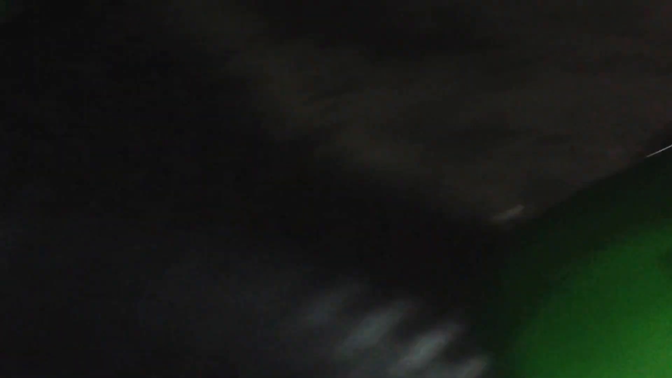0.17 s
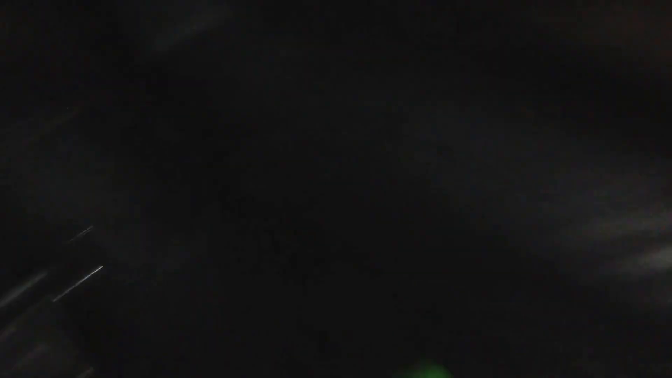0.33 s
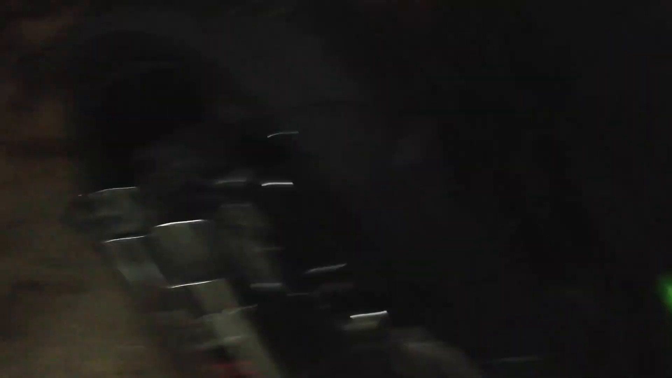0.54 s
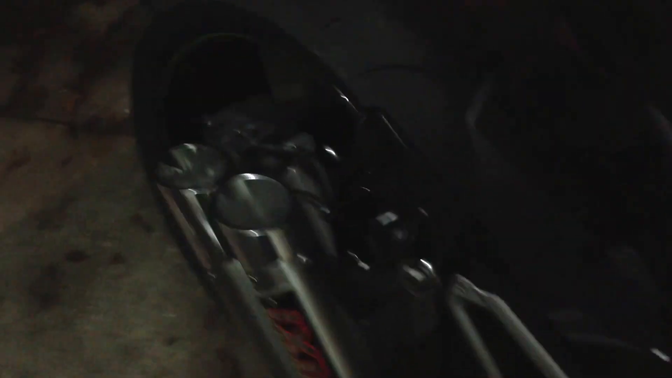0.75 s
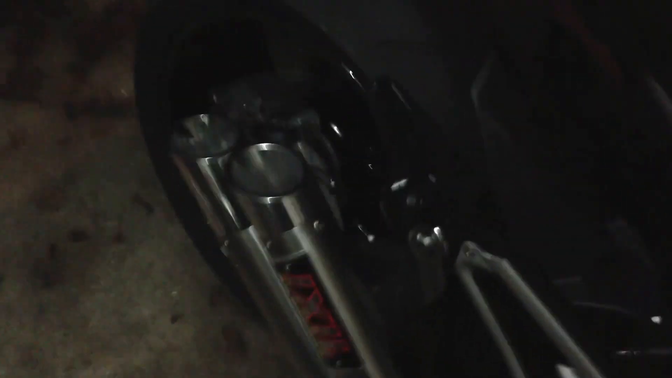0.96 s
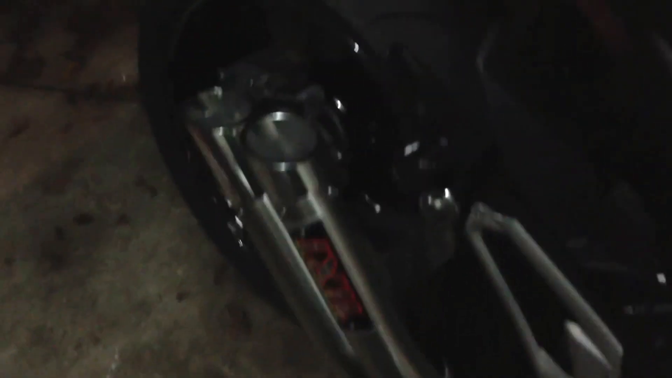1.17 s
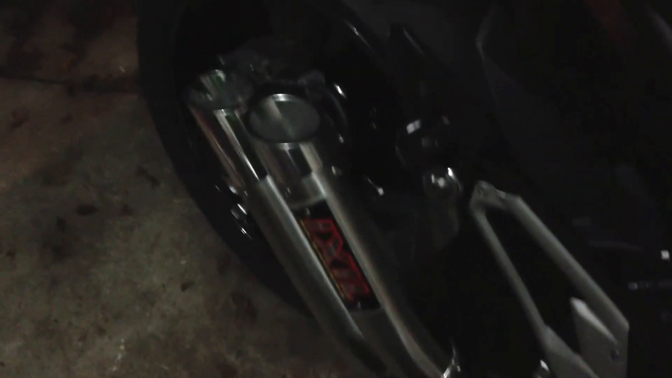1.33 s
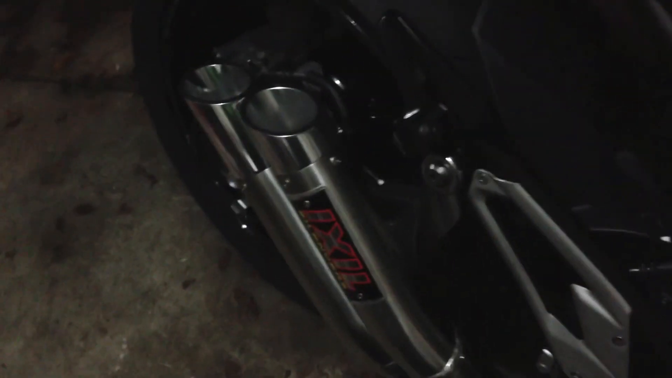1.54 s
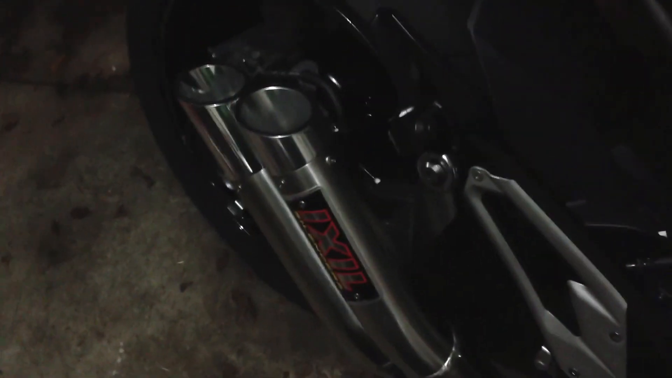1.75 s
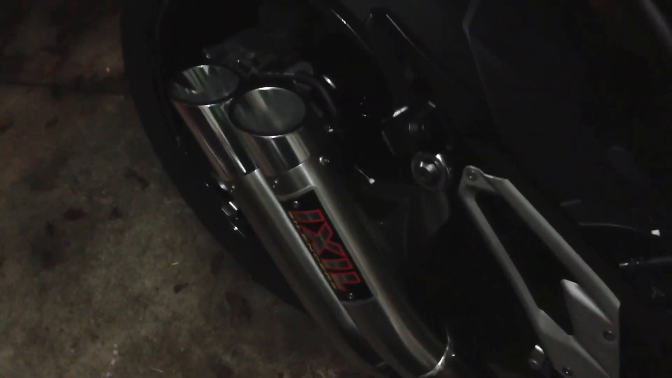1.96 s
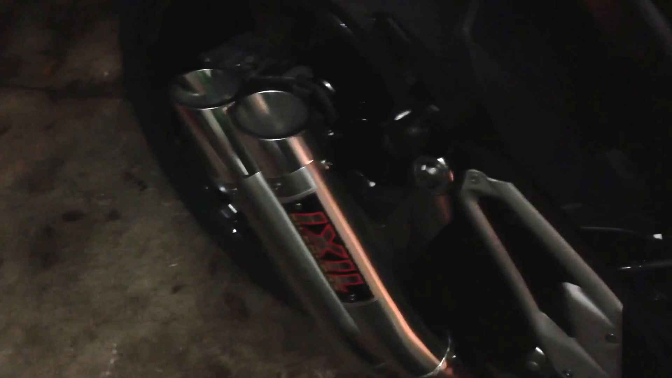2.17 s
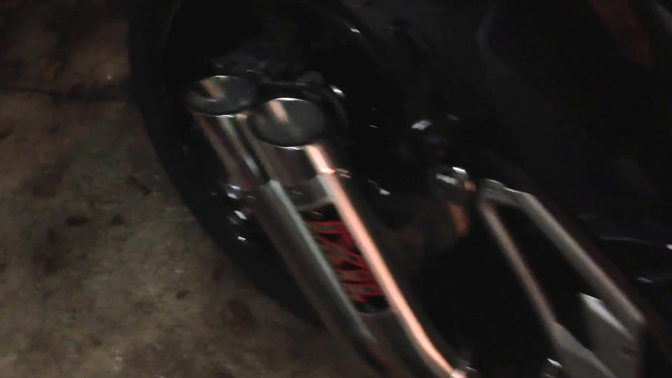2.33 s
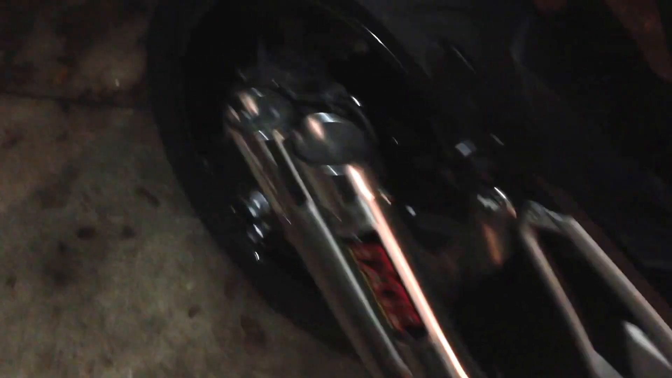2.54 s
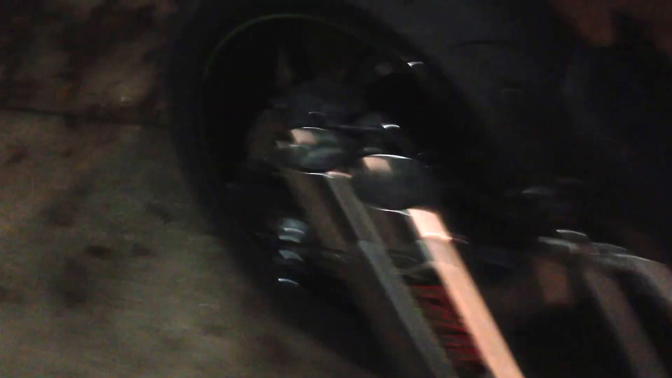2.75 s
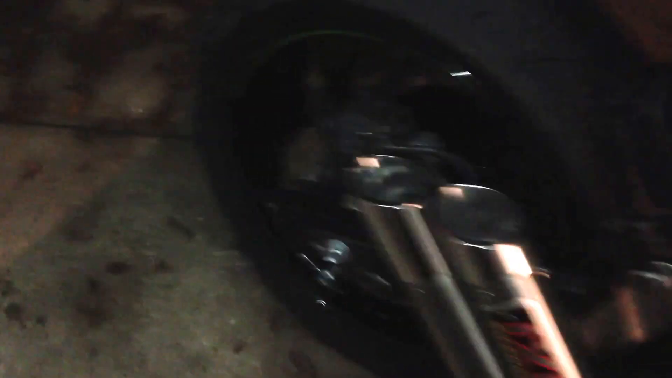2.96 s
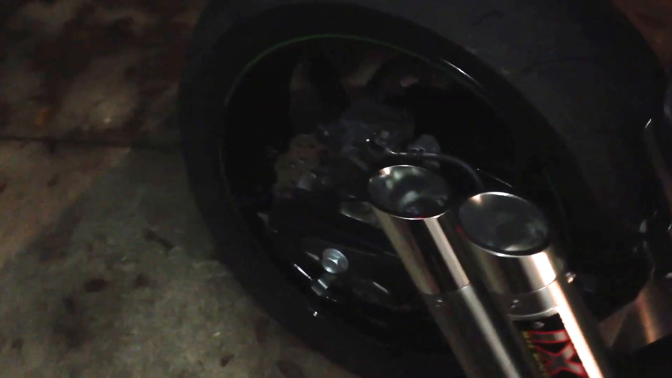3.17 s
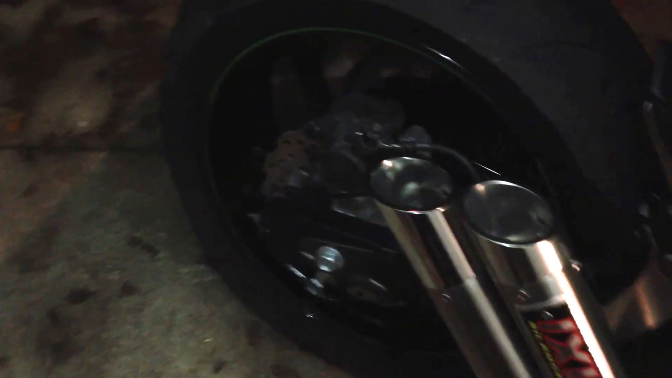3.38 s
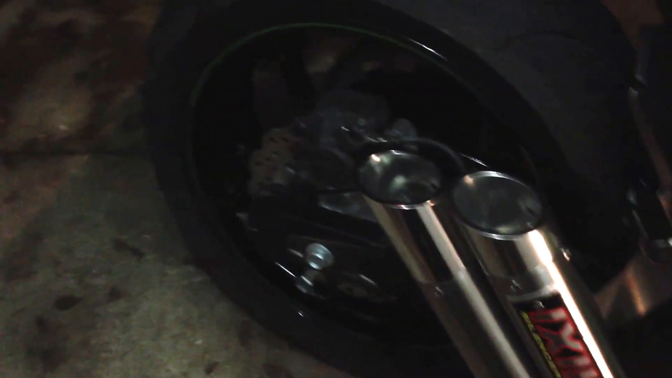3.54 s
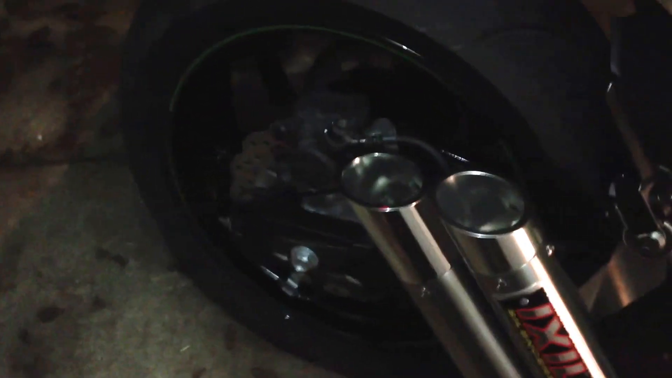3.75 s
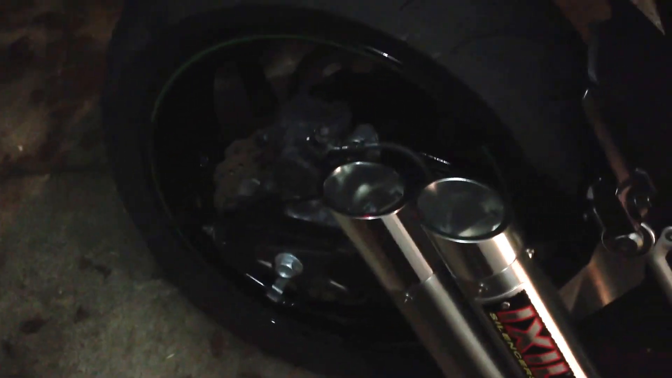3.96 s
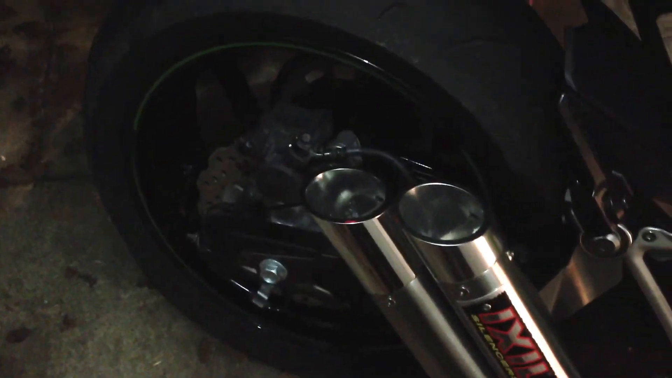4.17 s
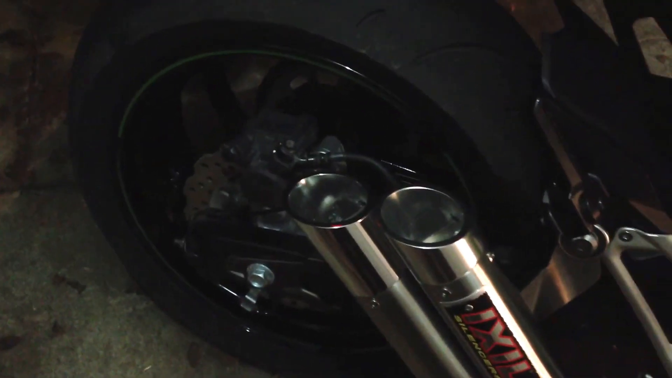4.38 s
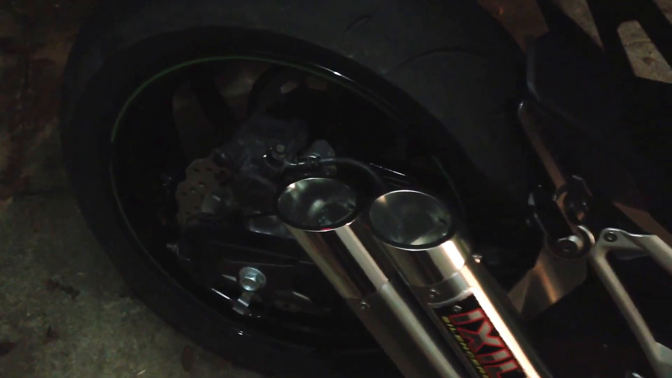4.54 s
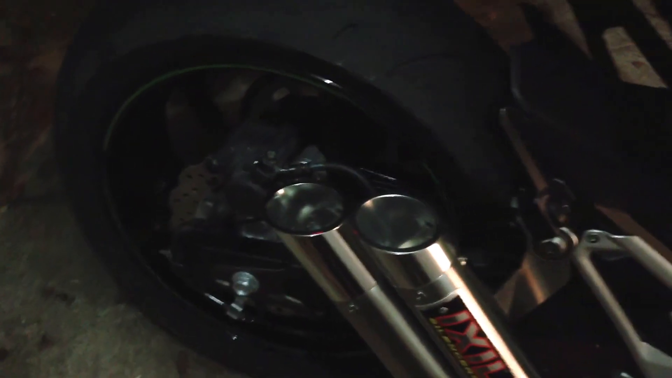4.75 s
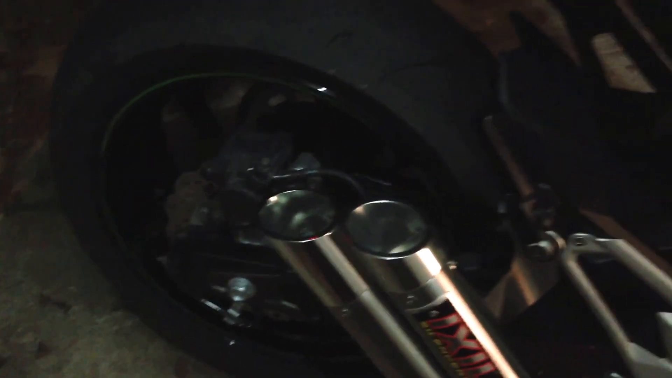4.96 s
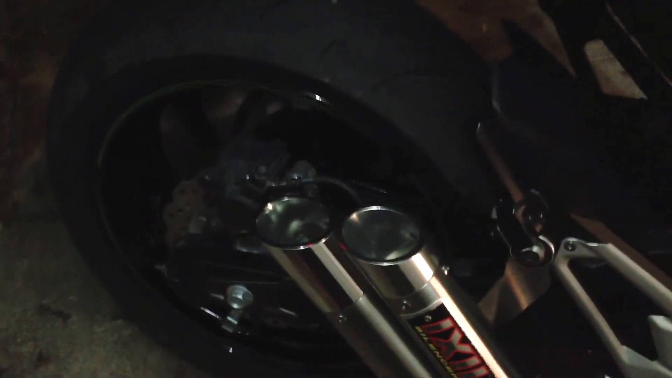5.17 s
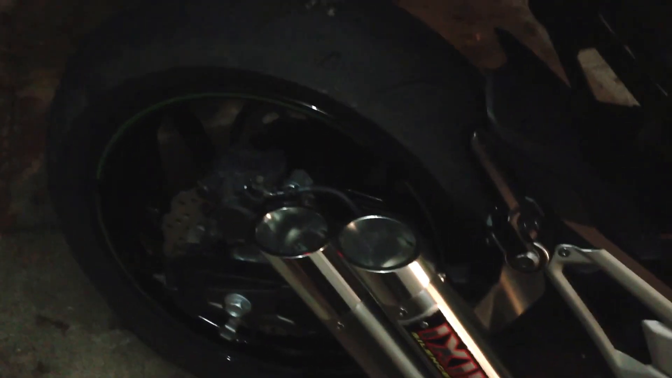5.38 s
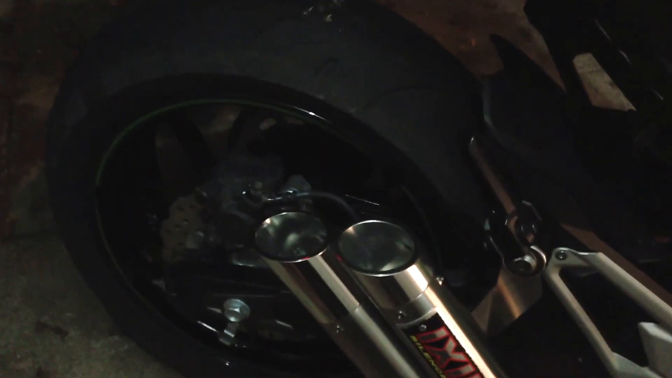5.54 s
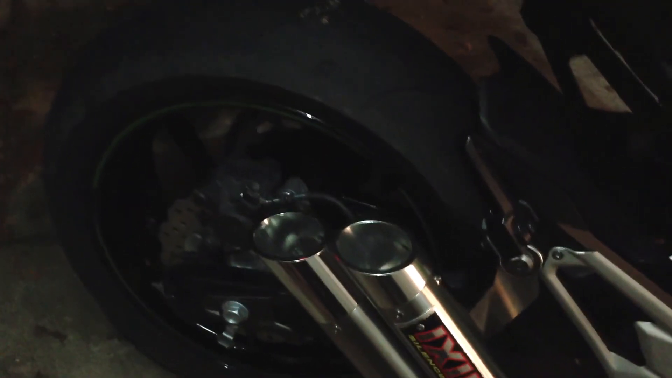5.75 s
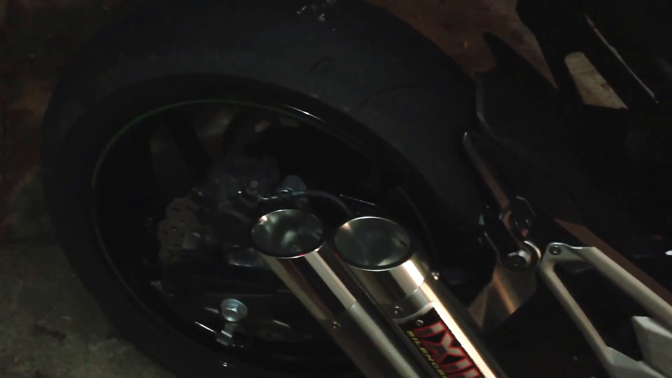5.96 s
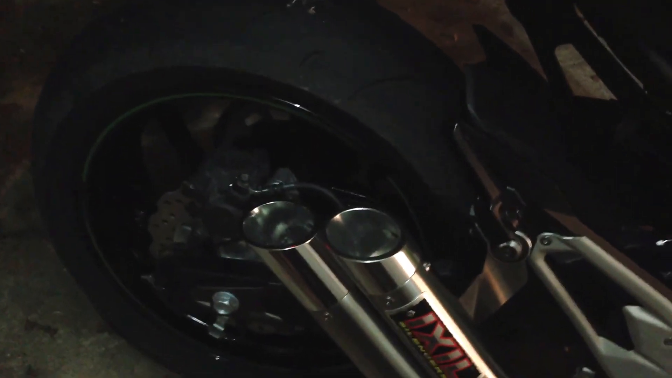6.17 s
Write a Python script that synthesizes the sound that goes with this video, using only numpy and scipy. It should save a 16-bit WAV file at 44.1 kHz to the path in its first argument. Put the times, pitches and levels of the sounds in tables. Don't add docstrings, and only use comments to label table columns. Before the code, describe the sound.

In a quiet outdoor yard with faint distant traffic, a shoe scrapes grit, faintly then hard. After a pause, a starter motor clunks in and grinds through two lurches. A cold four-cylinder motorcycle catches with a burst, stumbles with rattles and small squeaks, then settles into a loud, lumpy, hollow idle. A small microphone close to the pipe thins the deep bass and squashes the loudest blasts.

```python
import sys
import numpy as np
from scipy import signal
from scipy.fft import rfft, irfft, next_fast_len
from scipy.io import wavfile
from scipy.ndimage import uniform_filter1d, minimum_filter1d

SR = 44100
rng = np.random.default_rng(int(sys.argv[2]) if len(sys.argv) > 2 else 0)


def gain_from_db(level_db):
    decades = np.asarray(level_db, float) / 20
    return 10 ** decades


def dump(signal):
    limited = np.clip(np.atleast_2d(signal).T, -1, 1)
    pcm = np.round(limited * 32767).astype(np.int16)
    wavfile.write(sys.argv[1], SR, pcm)


N = 273861
T = np.arange(N) / SR
SIZE = next_fast_len(N + SR)
HZ = np.fft.rfftfreq(SIZE, 1 / SR)

# (time [s], firing rate [1/s])
SPEED = [(1.9, 44.29), (2.0, 44.68), (2.19, 36.66), (2.29, 31.88), (2.4, 36.7), (2.49, 39.63),
         (2.65, 37.36), (2.74, 38.58), (3.19, 42.77), (3.49, 43.27), (3.59, 44.02), (4.19, 46.03),
         (4.5, 46.32), (4.64, 46.29), (5.18, 46.87), (5.52, 48.53), (5.61, 48.05), (6.21, 49.01)]
CATCH_AT_S = SPEED[0][0]
CYLINDER_BITE_DB = [1.5, 4.1, 4.5, 1.5]
# (frequency [Hz], width [Hz], level [dB])
HOUSING = [(800, 220, 4), (1060, 26, -18), (1223, 150, 6.5), (1580, 215, 12.5), (1933, 123, 13),
           (2675, 29, 14.5), (3095, 22, 11.5), (3330, 62, 13), (3470, 27, 4), (3790, 21, 11.5),
           (4760, 57, -9), (6300, 110, -17), (7580, 91, -14), (7960, 34, -7.5), (9700, 49, -24)]


def evened(x):
    return x / np.sqrt(np.mean(x ** 2) + 1e-20)


def filtered(x, gain):
    return irfft(rfft(x, SIZE) * gain, SIZE)[:N]


def colour(points):
    hz, db = np.transpose(points)
    return gain_from_db(np.interp(np.log(HZ + 1), np.log(hz), db))


def mode(hz, width_hz):
    return 1j * HZ * width_hz / (hz ** 2 - HZ ** 2 + 1j * HZ * width_hz)


def modes(table):
    return sum((-1) ** k * gain_from_db(db) * mode(hz, width_hz) for k, (hz, width_hz, db) in enumerate(table))


def curve(rows, column):
    rows = np.array(rows)
    return np.interp(T, rows[:, 0], rows[:, column])


def level(rows, fade_s):
    start, end = rows[0][0], rows[-1][0]
    edge = np.interp(T, [start, start + fade_s, end - fade_s, end], [0, 1, 1, 0])
    return gain_from_db(curve(rows, 1)) * edge


def clicks(at, size):
    return np.bincount(np.asarray(at, int), size, N)[:N]


def grains(per_s, spread_db):
    draw = rng.random((N, 3))
    size = gain_from_db(-spread_db * np.log(draw[:, 2] + 0.029))
    return (draw[:, 0] < per_s / SR) * np.sign(draw[:, 1] - .5) * size


def swell(at, db, rise_s, fall_s):
    t = np.arange(6000) / SR
    shape = (1 - np.exp(-t / rise_s)) * np.exp(-t / fall_s)
    return signal.oaconvolve(clicks(at, gain_from_db(db)), shape)[:N]


def drifting(noise, window):
    return evened(uniform_filter1d(noise, window))


def yard():
    # (frequency [Hz], density [dB per Hz])
    yard_colour = [(18, -83), (30, -56), (124, -12.5), (161, -2), (327, -20), (425, -14), (473, -19),
                   (568, -14), (631, -18.5), (1390, -18.5), (2470, -26.5), (14700, -36), (15900, -49)]
    drift = drifting(rng.standard_normal(N), 6000)
    return gain_from_db(-56.5 + .5 * drift) * evened(filtered(rng.standard_normal(N), colour(yard_colour)))


def scuffs():
    # (time [s], level [dB])
    scuff_rows = [
        [(0.29, -67), (0.314, -50), (0.338, -47), (0.348, -39.5), (0.404, -47), (0.46, -67)],
        [(0.51, -67), (0.554, -18.5), (0.596, -24.5), (0.602, -22.5), (0.632, -36), (0.7, -66)],
    ]
    # (frequency [Hz], density [dB per Hz])
    grit_colour = [(180, -69), (300, -32), (511, -24), (841, -26), (929, -13), (1080, -19), (1190, -12.5),
                   (2240, -2.5), (2650, -5), (14400, -35.5), (15900, -58)]
    # (time [s], peak [dB])
    stones = [(0.3162, -38), (0.3461, -31), (0.5444, -21), (0.5536, -10), (0.5604, -14), (0.5664, -18),
              (0.5744, -15), (0.5814, -18), (0.6005, -9), (0.6064, -13)]
    grit = evened(grains(3000, 3)) + .6 * rng.standard_normal(N)
    grit = evened(filtered(grit, colour(grit_colour)))
    s, db = np.transpose(stones)
    crack = filtered(clicks(s * SR, gain_from_db(db + 21)), mode(1960, 440) - 0.51 * mode(3440, 900))
    return .5 * grit * sum(level(rows, 0.0092) for rows in scuff_rows) + crack


def grinding():
    return rng.standard_normal(N) + 0.51 * evened(grains(900, 2.4))


def starter():
    # (time [s], gear mesh rate [Hz], whine share [0-1])
    mesh_rows = [(1.535, 600, .15), (1.6, 900, .15), (1.641, 1112, .5), (1.685, 1068, .6), (1.72, 945, .68),
                 (1.752, 795, .62), (1.805, 750, .3), (1.865, 945, .38), (1.96, 1018, .12)]
    # (frequency [Hz], density [dB per Hz])
    grind_colour = [(71, -48), (120, -16.5), (295, -4.5), (788, -15.5), (947, -8), (1490, -11), (1860, -2),
                    (2380, -7.5), (3730, -1.5), (5070, -21.5), (9560, -24.5), (14400, -36), (15900, -56)]
    # (time [s], load [dB], fall [s], squeal above 5 kHz re load [dB])
    lurches = [
        (1.537, -21.5, 0.034, -11),
        (1.571, -22.5, 0.056, -17),
        (1.632, -25, 0.033, 0.5),
        (1.658, -20.5, 0.036, -1.5),
        (1.706, -10.5, 0.022, -24),
        (1.743, -17.5, 0.023, -25),
        (1.830, -9.5, 0.019, -9.5),
        (1.857, -12, 0.022, -17),
    ]
    wobble, flutter = rng.standard_normal((2, N))
    mesh_turns = np.cumsum(curve(mesh_rows, 1) * (1 + .025 * drifting(wobble, 250))) / SR
    broken = gain_from_db(2.6 * drifting(rng.standard_normal((6, N)), 600))
    teeth = sum(b * np.cos(2 * np.pi * (k * mesh_turns + rng.random())) for k, b in enumerate(broken, 1))
    teeth = teeth * gain_from_db(2.5 * drifting(flutter, 120))

    grind = grinding()
    housing, tint = modes(HOUSING), colour(grind_colour)
    upper = 1 / (1 + (5000 / (HZ + 1)) ** 8)
    rough = .5 * evened(filtered(grind, tint * (1 - upper)))
    rough = rough + 0.73 * evened(filtered(grind, housing * (1 - upper)))
    whine = evened(filtered(teeth, housing + 0.37 * mode(1500, 3800)))
    squeal = evened(filtered(grind, (0.87 * housing + 1.15 * tint) * upper))
    squeal = squeal * gain_from_db(2.5 * drifting(wobble, 300))

    heave = np.array([swell([s * SR], [db], 0.0072, fall_s) for s, db, fall_s, _ in lurches])
    heave = heave + gain_from_db(-27.5) / len(lurches)
    shrill = gain_from_db(np.array(lurches)[:, -1]) @ heave
    share = np.clip(curve(mesh_rows, 2), 0, 1)
    engaged = np.interp(T, [1.9, 1.98], [1, 0]) * (T > lurches[0][0])
    return engaged * (1.91 * heave.sum(0) * (share * whine + (1 - share) * rough) + shrill * squeal)


def knocks():
    # (time [s], peak [dB])
    knock_rows = [
        (1.5375, 3),
        (1.8317, 2),
    ]
    s, db = np.transpose(knock_rows)
    burst = rng.standard_normal(N) * swell(s * SR, db - 9, 0.0004, 0.0045)
    return filtered(burst, mode(4000, 5700) ** 2 + 0.18 * modes(HOUSING))


def chuff():
    # (time [s], level [dB])
    chuff_rows = [
        [(1.71, -77), (1.738, -27), (1.818, -52), (1.862, -34), (1.89, -44), (1.9, -12)],
    ]
    air = evened(filtered(rng.standard_normal(N), mode(157, 142) ** 3))
    return air * sum(level(rows, 0.02) for rows in chuff_rows)


def clutch():
    # (time [s], level [dB])
    overrun_rows = [(1.9, -36.5), (2.0, -33), (2.2, -30), (2.5, -29), (2.56, -41.5), (2.75, -43)]
    # (time [s], level [dB])
    coast_rows = [(2.5, -37), (2.62, -35), (2.9, -36), (3.3, -43)]
    # (frequency [Hz], width [Hz], level [dB])
    clutch_modes = [(1490, 440, 2), (2164, 77, 5.5), (2540, 540, -3.5), (3510, 90, -1.5), (3760, 52, 4),
                    (4720, 100, -5), (7500, 170, -19), (9100, 1030, -10.5), (9670, 1900, -14.5)]
    chatter = grinding() * gain_from_db(1.5 * drifting(rng.standard_normal(N), 900))
    ring = modes(clutch_modes)
    whirr = 0.99 * level(overrun_rows, 0.01) * evened(filtered(chatter, ring))
    dull = evened(filtered(chatter, ring / (1 + (HZ / 3200) ** 6)))
    return whirr + level(coast_rows, .04) * dull


def warmth():
    from_s, by_s = 2.9, 4.4
    return np.clip((T - from_s) / (by_s - from_s), 0, 1)


def firings():
    charge_db = [-2.7, -1.9, -.7, -3.8]
    lag_ms = [0, .13, -.21, -.45]
    # (time [s], level re the cylinder's habit [dB])
    misfires = [(2.011, -8.4), (2.064, -11.0), (2.086, -6.6), (2.139, -4.7), (2.194, -3.3), (2.225, -12.0),
                (2.315, -10.0), (2.541, -6.1), (2.566, -11.0), (2.729, -3.0), (2.957, -2.9), (3.057, -6.0),
                (3.178, -3.3), (3.202, -2.5), (3.298, -3.2), (3.392, -4.0), (3.486, -2.6), (3.58, -3.2),
                (4.093, -4.4), (4.268, -9.0), (4.445, -8.8), (5.369, -3.0), (5.536, -7.2), (5.705, -5.0),
                (5.726, -9.0), (5.895, -8.8), (6.062, -6.0), (6.167, -2.9)]
    first_turn, stumble_hz, stumble_after_s, stumble_s = -.899, 6.19, .02, .012
    rich_db, rich_s, hangover, scatter_db, even_warm, warm_gain_db = 2.5, .08, .25, .5, 0.2, 0

    s, loss_db = np.transpose(misfires)
    u = np.arange(round(10 * stumble_s * SR)) / (stumble_s * SR)
    lost_push = clicks((s + stumble_after_s) * SR, 1 - gain_from_db(loss_db))
    sag = signal.oaconvolve(lost_push, u * np.exp(1 - u))[:N]
    turns = first_turn + np.cumsum((curve(SPEED, 1) - stumble_hz * sag) * (T >= CATCH_AT_S)) / SR
    at = np.flatnonzero(np.diff(np.ceil(turns)) > 0)
    cylinder = np.arange(len(at)) % len(charge_db)
    at = at + np.round(np.array(lag_ms)[cylinder] * SR / 1000).astype(int)

    warm = warmth()[at]
    lost = np.bincount(abs(at[:, None] / SR - s).argmin(0), loss_db, len(at))
    db = np.array(charge_db)[cylinder] * (1 - even_warm * warm) + lost
    db = db + hangover * np.roll(lost, 1) * (lost == 0)
    db = db + rich_db * (at < (CATCH_AT_S + rich_s) * SR)
    return at, cylinder, db + warm_gain_db * warm + scatter_db * rng.standard_normal(len(at))


def exhaust(at, cylinder, db):
    # (frequency [Hz], width [Hz], level [dB], sign)
    pipe = [(135.4, 31, 50.5, -1), (231.4, 94, 54, 1), (415.2, 27.7, 59, -1)]
    # (delay [ms], factor)
    echoes = [(7.4, -0.36), (15.6, -0.28)]
    puff_ms, lead_ms, blast_db = 1.03, 3.0, -0.5
    cold_sag = 0.034
    scatter = rng.standard_normal((len(at), len(pipe)))
    puff = np.exp(-2 * (np.pi * HZ * puff_ms / 1000) ** 2 + 2j * np.pi * HZ * lead_ms / 1000)
    puff = puff * (1 + sum(share * np.exp(-2j * np.pi * HZ * ms / 1000) for ms, share in echoes))
    warm = warmth()[at]
    out = 0
    for k, (hz, width_hz, mode_db, sign) in enumerate(pipe):
        bite_db = np.array(CYLINDER_BITE_DB)[cylinder] * (k == len(pipe) - 1)
        size = gain_from_db(blast_db + db + mode_db + bite_db + .8 * scatter[:, k])
        for share, sag in ((warm, 0), (1 - warm, cold_sag)):
            blast = rfft(clicks(at, share * size), SIZE)
            out = out + np.sign(sign) * blast * mode(hz * (1 - sag), width_hz)
    return irfft(out * puff, SIZE)[:N]


def turbulence(at, cylinder, db):
    # (frequency [Hz], density [dB per Hz])
    boom_colour = [(12, -65), (20, -42), (86, -38), (119, 4.5), (161, -10), (214, 4.5), (242, 4),
                   (282, -4.5), (355, 3.5), (520, -38), (680, -50), (1140, -120)]
    gusts = .3 * (T > CATCH_AT_S) + swell(at - 100, db, .002, .012)
    boom = evened(filtered(rng.standard_normal(N) * gusts, colour(boom_colour)))
    return gain_from_db(-27 - 1.7 * warmth()) * boom


def low_rumble(at, cylinder, db):
    # (frequency [Hz], density [dB per Hz])
    rumble_colour = [(15, -8), (30, -11), (60, 2), (100, -6), (140, -22), (200, -40)]
    lumps_db = 2.5 * db + 4 * rng.standard_normal(len(at))
    rumble = rng.standard_normal(N) * swell(at - 100, lumps_db, 0.0039, 0.0087)
    return gain_from_db(-51 + 6 * (warmth() + 1.0)) * evened(filtered(rumble, colour(rumble_colour)))


def rush(at, cylinder, db):
    cylinder_hiss_db = [-8.5, -8, -14, -15]
    # (frequency [Hz], width [Hz], level [dB])
    crack_modes = [(565.3, 14.5, 2.5), (673, 48, -3), (910, 41, -5.5), (1148, 23, -7.5)]
    # (frequency [Hz], density [dB per Hz])
    rush_colour = [(260, -11), (450, 3), (607, 9), (683, 5), (805, -7), (908, -5.5), (1320, -15.5),
                   (1830, -13), (2430, -24), (3640, -21), (13500, -42.5), (15200, -42), (15900, -54)]
    # (frequency [Hz], width [Hz], level [dB])
    case_modes = [(1490, 140, -32), (1918, 120, -2.5), (2644, 43, -11), (3240, 61, -11), (3705, 90, -12.5),
                  (5320, 690, -19)]
    gas, clatter, tick = rng.standard_normal((3, N))
    scatter = rng.standard_normal((len(at), 3))
    hiss_db = 1.6 * db + np.array(cylinder_hiss_db)[cylinder]
    front_db = 1.3 * db + np.array(CYLINDER_BITE_DB)[cylinder] + 2.5 * scatter[:, 0]
    crack = filtered(clicks(at - 60, gain_from_db(front_db)), modes(crack_modes))

    shape = colour(rush_colour)
    low = filtered(gas * (.3 + swell(at - 70, 1.5 * db, .001, .006)), shape * mode(800, 1200))
    shaken = clatter * (.5 + swell(at, hiss_db, 0.009, 0.0024))
    ring = filtered(shaken + 0.33 * evened(grains(600, 17.0)), modes(case_modes))
    puffs = .22 + swell(at, hiss_db + 1.5 * scatter[:, 1], .0015, .015)
    valves = tick * swell(at + 20, hiss_db + 3 * scatter[:, 2], .0003, .003)
    top = filtered(gas * puffs + 0.13 * valves, shape * (1 - mode(628, 1260)))

    warm = warmth()
    body = gain_from_db(-3) * evened(crack) + gain_from_db(-9) * evened(low)
    body = body + gain_from_db(-7.0 + 4.5 * (1 - warm)) * evened(ring)
    body = body + gain_from_db(2 + 3 * warm) * evened(top)
    catch = np.clip(1 - (T - CATCH_AT_S) / 0.06, 0, 1)
    gain = gain_from_db(-31.5 - .6 * warm + 12 * catch) * (T >= CATCH_AT_S)
    return 1.157 * gain * evened(body)


def squeaks(at, cylinder, db):
    # (multiple of the firing rate, level [dB])
    squeak_tones = [(23.7, -34.5), (50, -40)]
    first_s, last_s, lead_s = 2.35, 3.25, .011
    t, out = np.arange(1500) / SR, np.zeros(N)
    squeaking = (cylinder == 1) & (at > first_s * SR) & (at < last_s * SR)
    for s in at[squeaking] / SR - lead_s:
        for order, tone_db in squeak_tones:
            wobble = rng.standard_normal(len(t))
            hz = order * np.interp(s, *np.transpose(SPEED))
            turns = np.cumsum(hz * (1 + .035 * drifting(wobble, 150))) / SR
            tone = gain_from_db(tone_db + 3 + wobble[0]) * np.hanning(len(t)) * np.sin(2 * np.pi * turns)
            out[round((s - .014) * SR):][:len(t)] += tone
    return out


def rattles():
    # (time [s], peak [dB])
    rattle_rows = [(2.3794, -19), (2.723, -14), (2.8344, -15), (3.2244, -22), (3.3184, -18), (3.4124, -17),
                   (3.6894, -24), (3.8724, -18), (3.9594, -18), (4.2063, -20), (4.3104, -19), (5.6594, -19),
                   (5.7664, -18)]
    s, db = np.transpose(rattle_rows)
    burst = rng.standard_normal(N) * swell(s * SR, db - 4, .0005, 0.005)
    return filtered(burst, mode(2700, 5000) ** 2)


def scene():
    fired = firings()
    bass_cut = signal.freqs(*signal.butter(4, 131, "high", analog=True), HZ)[1]
    blasts = filtered(exhaust(*fired) + turbulence(*fired), bass_cut)
    engine = blasts + low_rumble(*fired) + rush(*fired) + squeaks(*fired) + rattles()
    cranking = starter() + knocks() + chuff() + clutch()
    return (yard() + scuffs() + cranking + engine)[None]


def low_pass(x):
    return signal.sosfilt(signal.butter(12, 16090, fs=SR, output="sos"), x)


def record(dry):
    ceiling, edge_hz = .975, 15300
    room = minimum_filter1d(np.minimum(ceiling / (abs(dry) + 1e-9), 1), size=121)
    held = dry * uniform_filter1d(room, size=121)
    edge = signal.firwin(511, edge_hz, window=("kaiser", 9), fs=SR)
    mix = signal.oaconvolve(held, edge[None], "same")
    return low_pass(mix)


dry = scene()
out = record(dry)
dump(out)
```